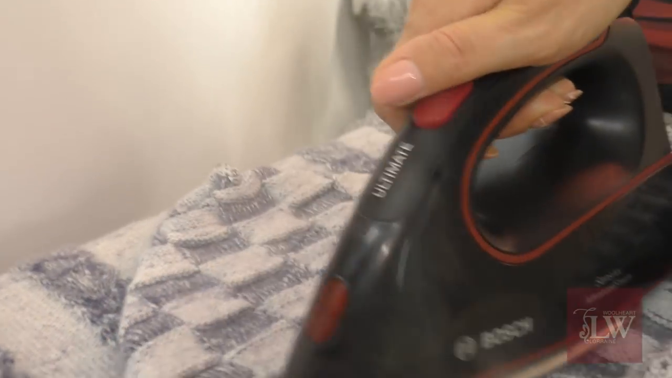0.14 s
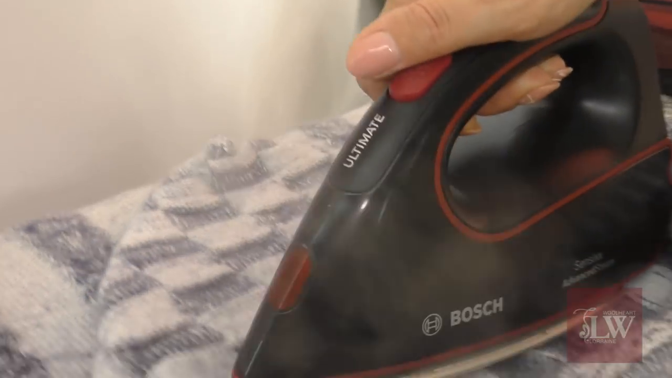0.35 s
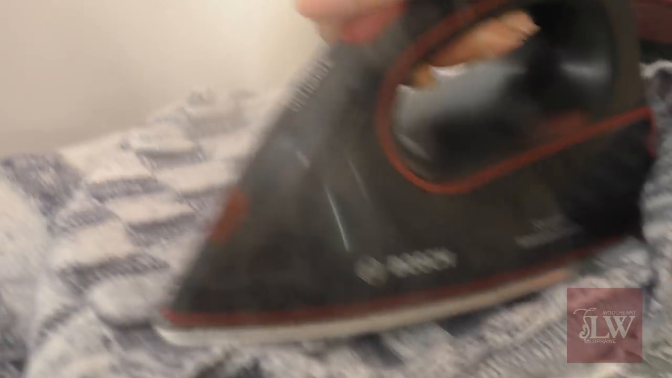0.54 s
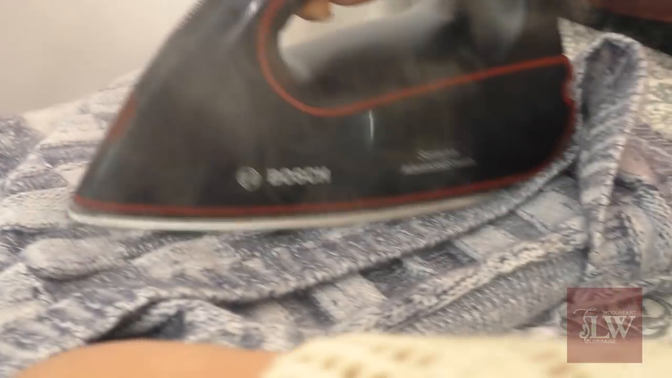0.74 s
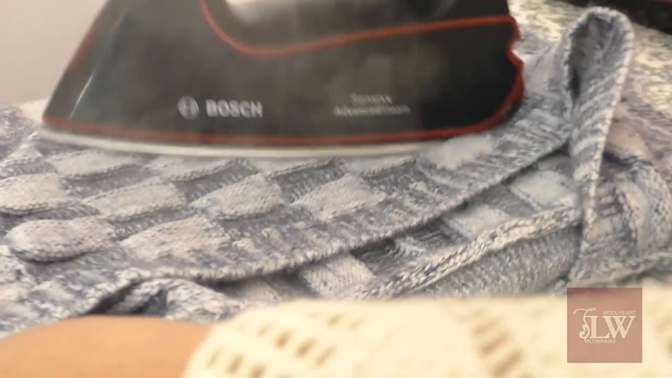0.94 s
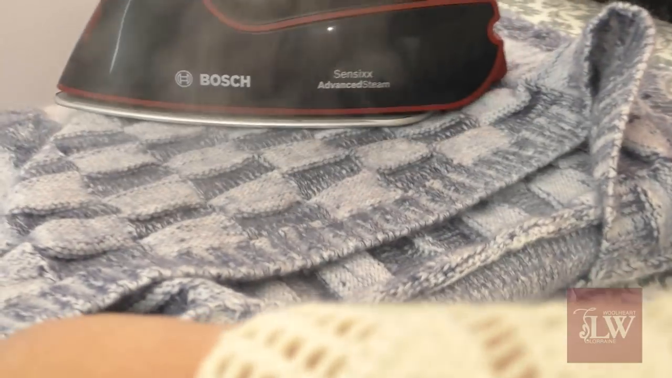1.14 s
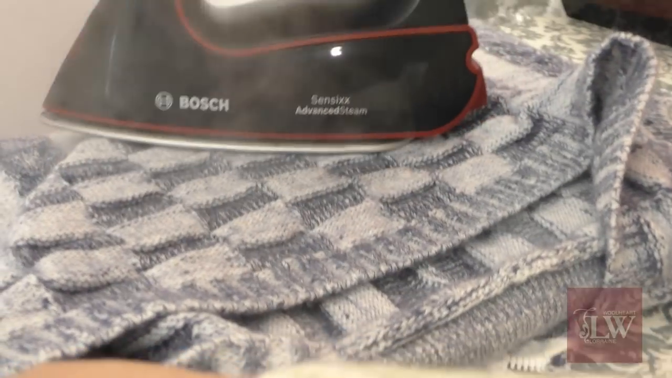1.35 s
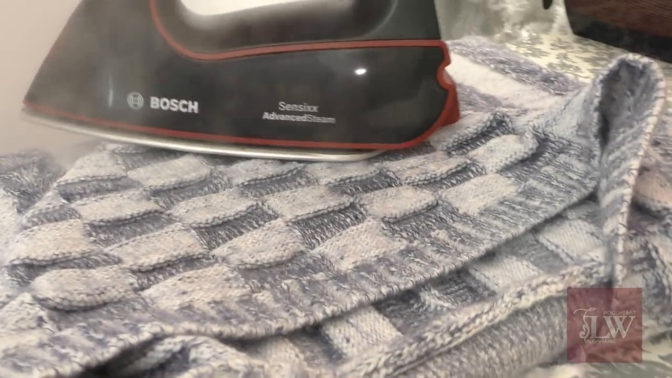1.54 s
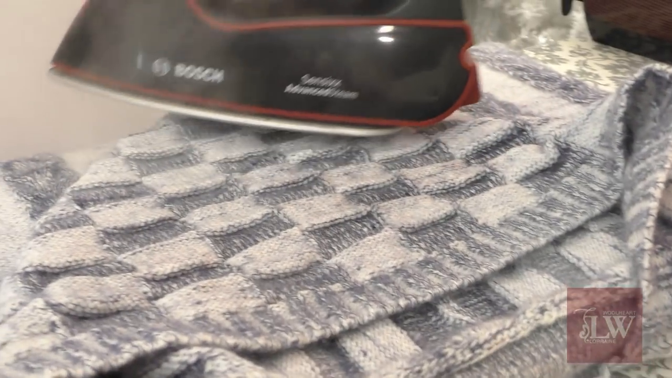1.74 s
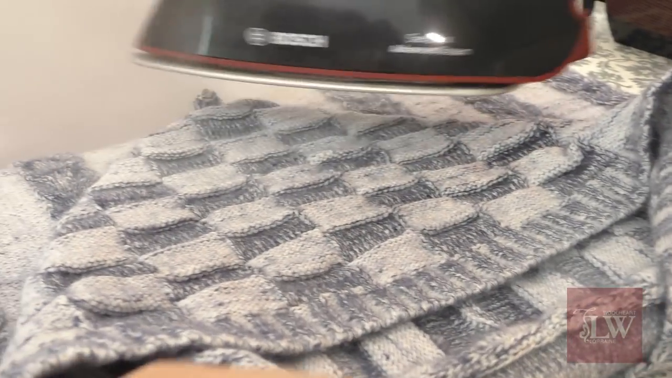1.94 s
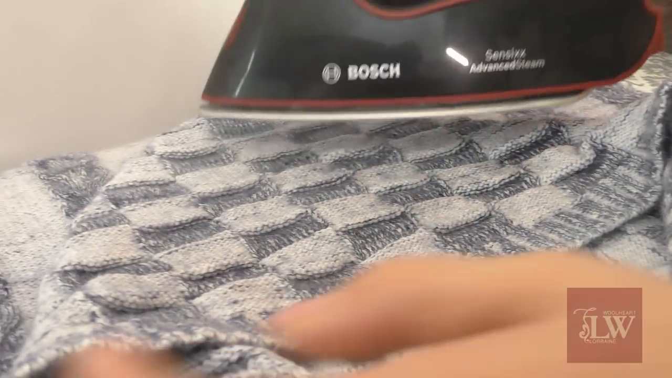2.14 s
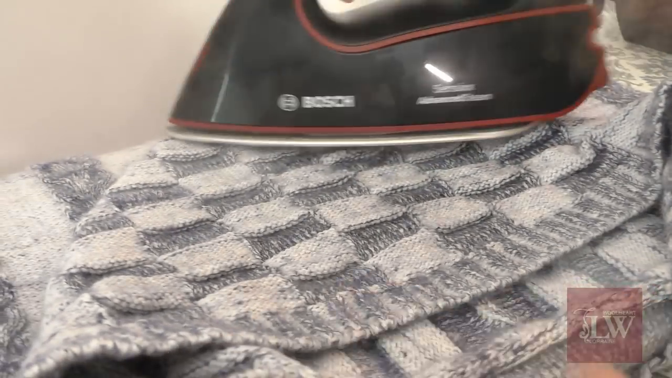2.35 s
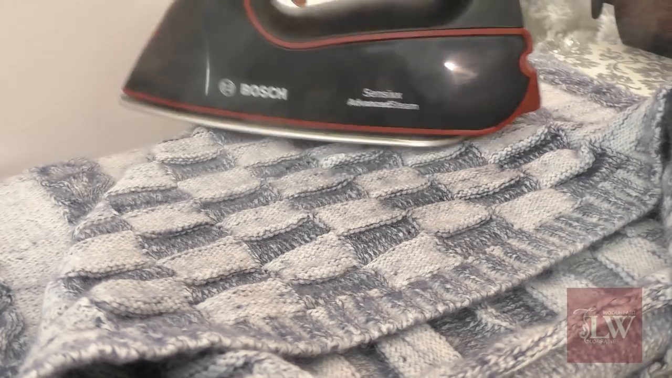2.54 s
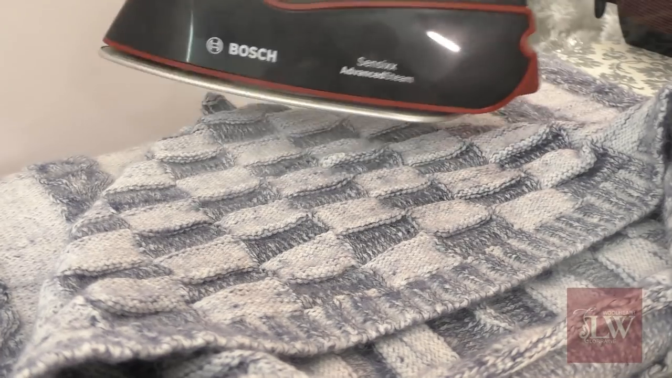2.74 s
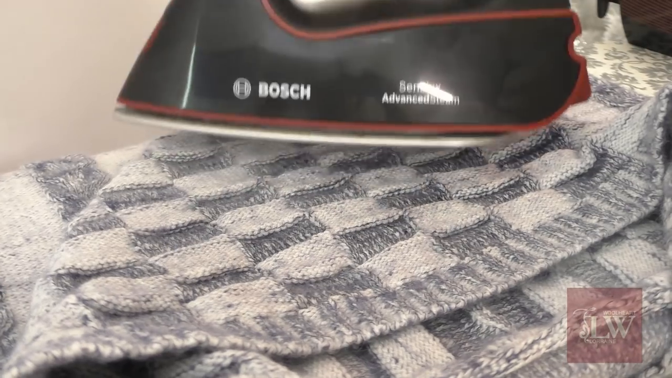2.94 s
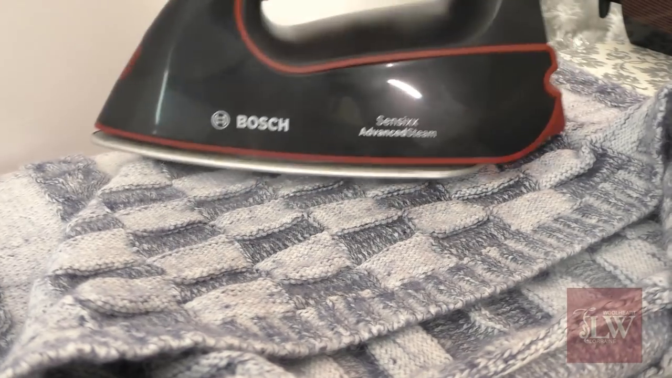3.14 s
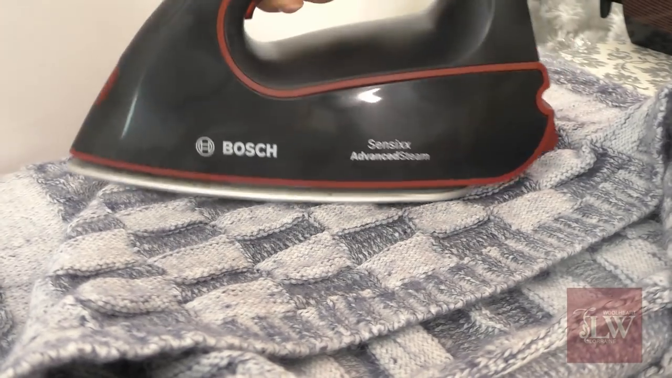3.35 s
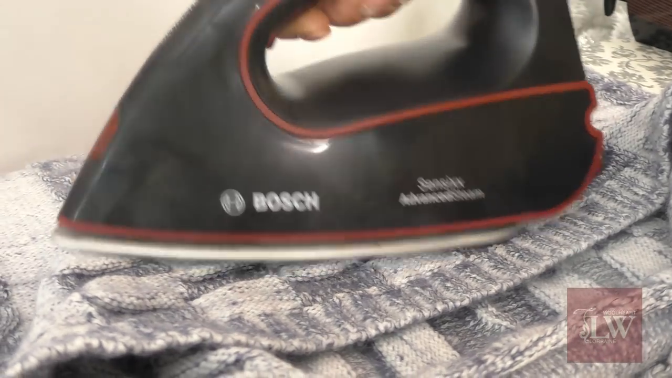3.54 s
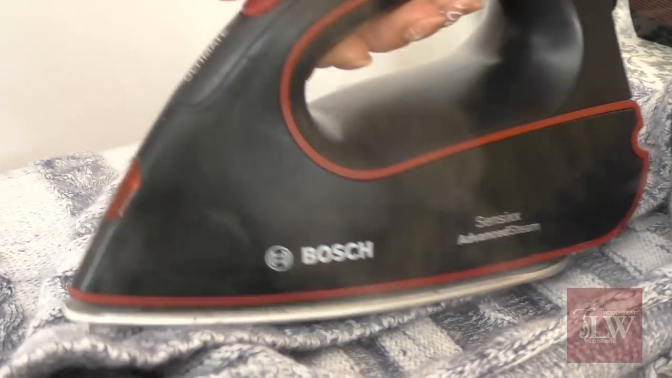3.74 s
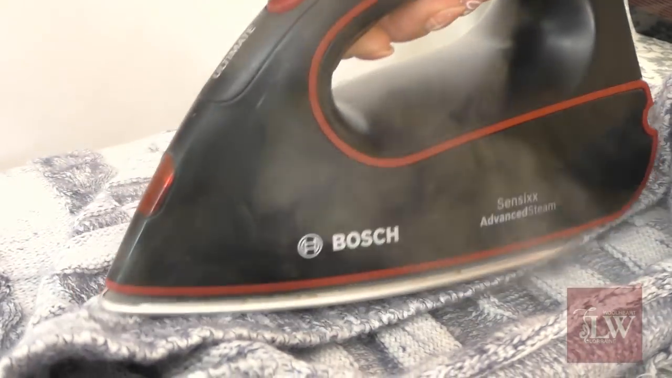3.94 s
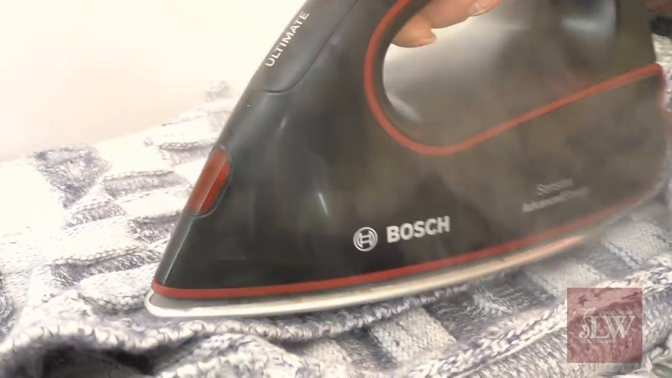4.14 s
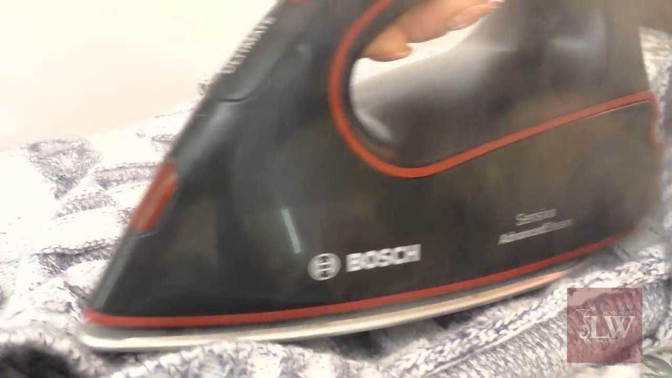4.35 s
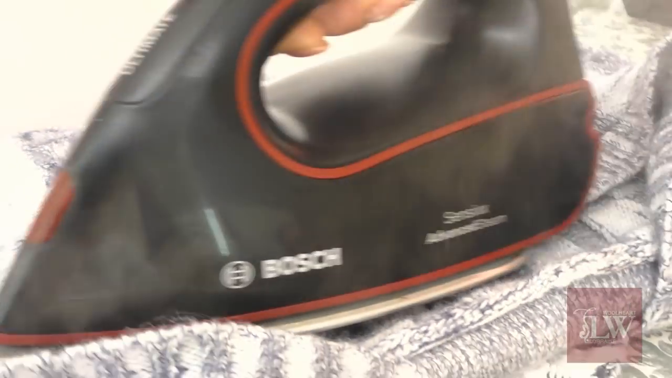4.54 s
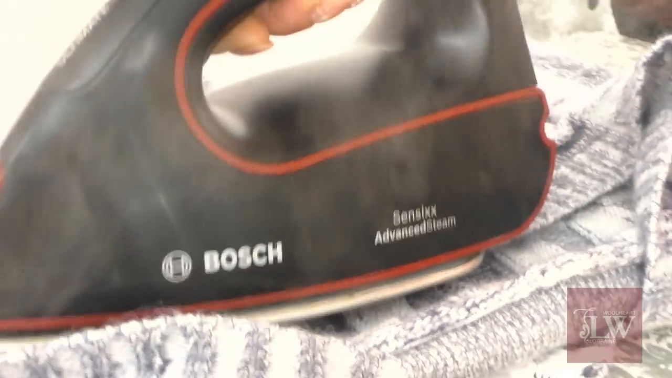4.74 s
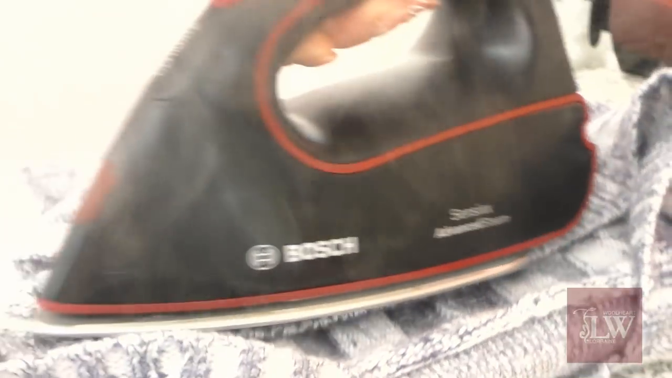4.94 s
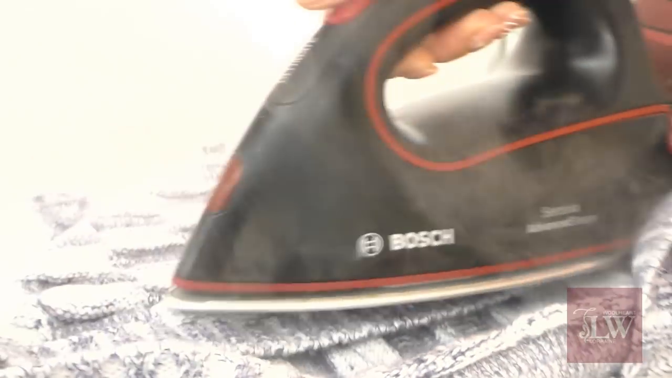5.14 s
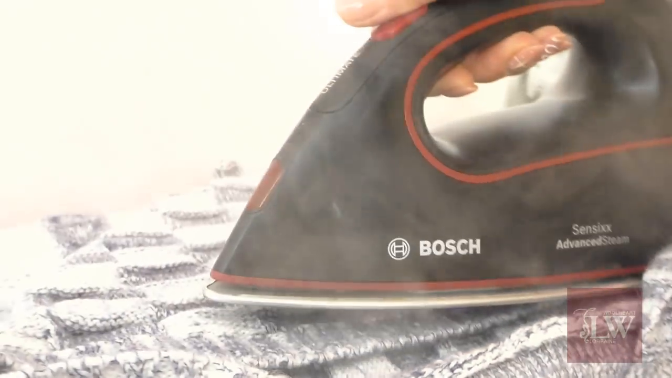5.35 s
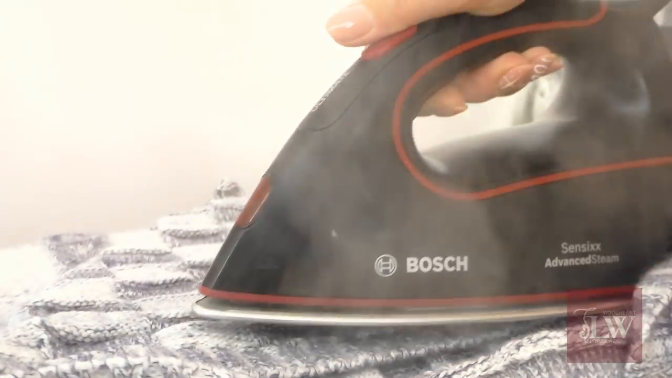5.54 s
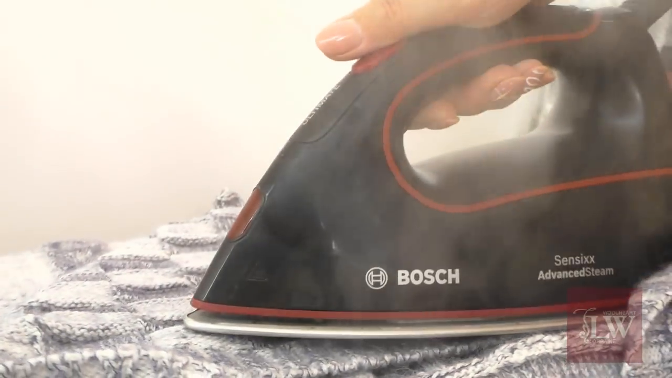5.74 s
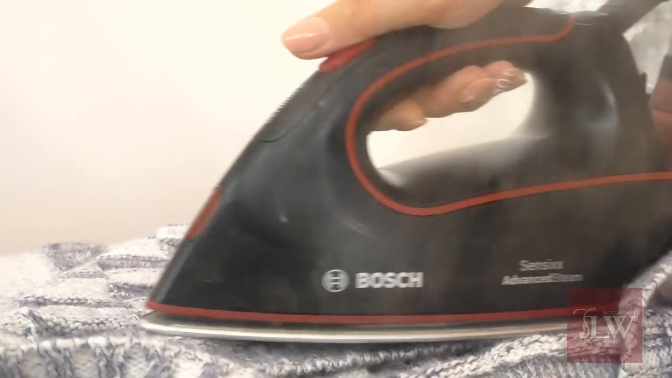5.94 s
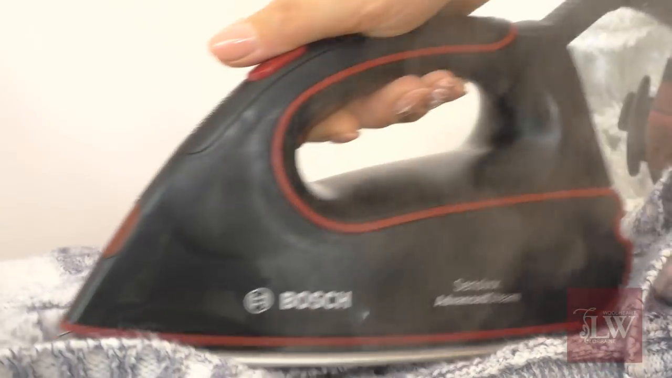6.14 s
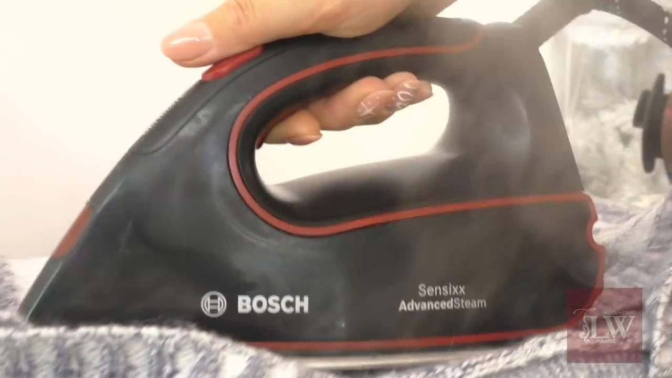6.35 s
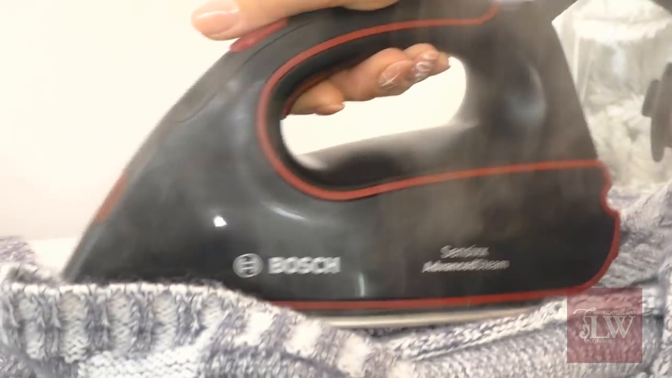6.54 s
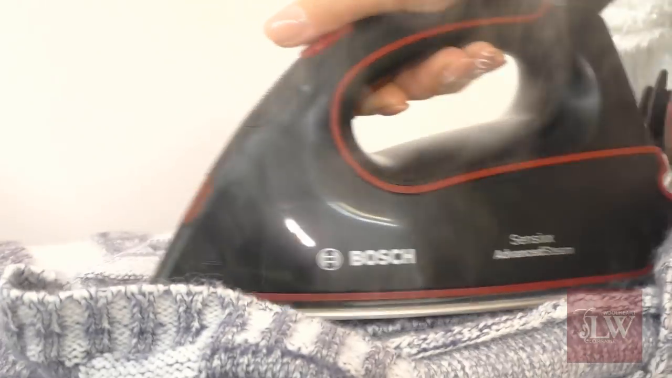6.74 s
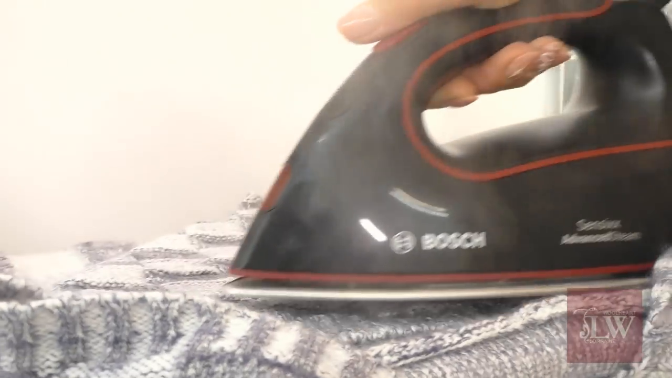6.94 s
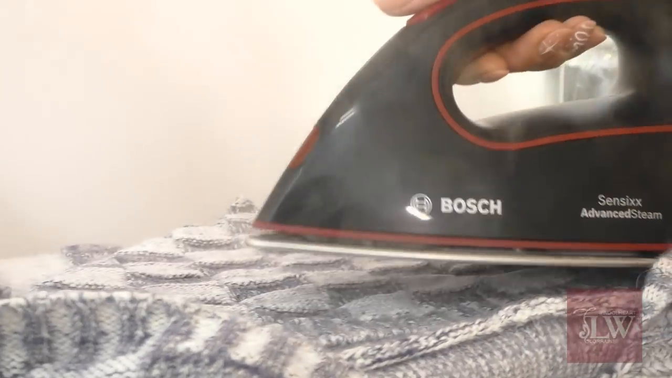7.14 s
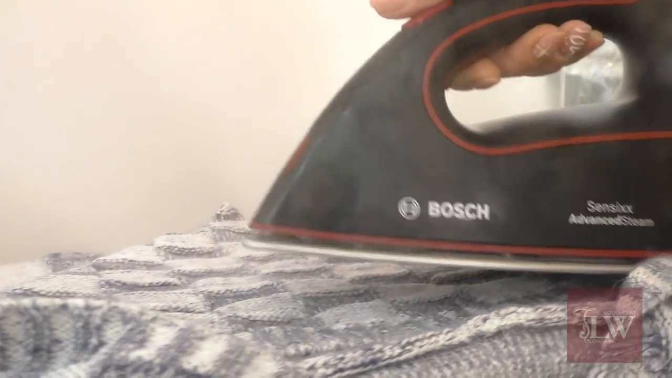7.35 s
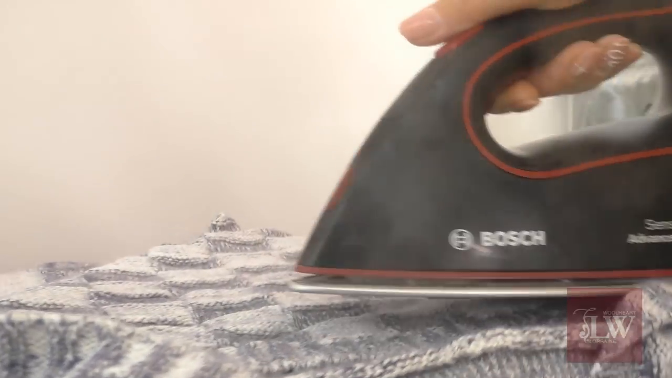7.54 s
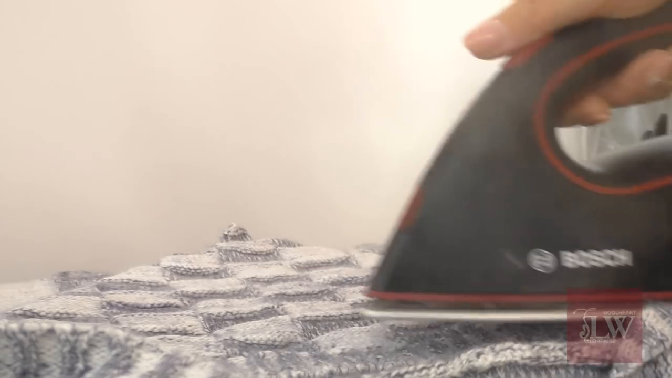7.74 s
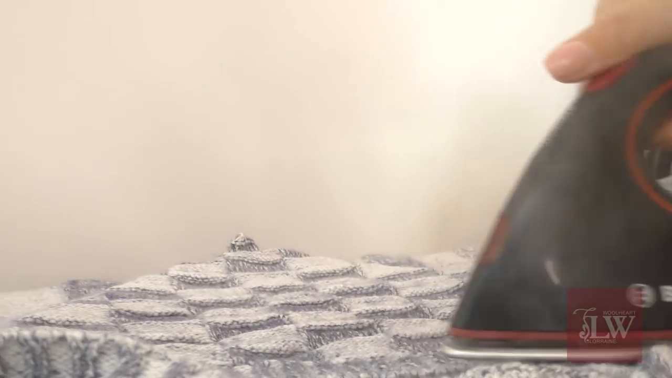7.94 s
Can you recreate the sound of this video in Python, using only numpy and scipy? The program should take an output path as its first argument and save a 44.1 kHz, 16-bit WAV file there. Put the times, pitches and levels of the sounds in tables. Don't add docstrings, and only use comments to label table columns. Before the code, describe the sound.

Continuous airy steam from an iron, recorded close in stereo with little room echo. Dense and mid-bright, it dulls slightly when pressed into fabric and brightens when lifted. Near two seconds a plastic snap precedes a muffled thud and quick fade. A soft low murmur fills the gap, with tiny trigger creaks, then a louder snap and valve pop restart the hiss, which runs on unbroken.

```python
import sys
import numpy as np
from scipy import signal
from scipy.fft import rfft, irfft
from scipy.io import wavfile
from scipy.ndimage import uniform_filter1d

SR = 44100
rng = np.random.default_rng(int(sys.argv[2]) if len(sys.argv) > 2 else 0)


def field_ratio(decibels):
    return 10 ** (np.asarray(decibels, dtype=float) / 20)


def to_wav(s):
    ch = np.atleast_2d(s).T
    pcm = np.round(np.clip(ch, -1, 1) * 32767)
    wavfile.write(sys.argv[1], SR, pcm.astype(np.int16))


N = 356935


def evened(x):
    return x / np.sqrt(np.mean(x ** 2) + 1e-20)


def read(points, hz):
    f, value = np.transpose(points)
    return np.interp(np.log(hz + 1), np.log(f + 1), value)


def bump(hz, centre_hz, width_hz):
    return 1 / (1 + (2 * (hz - centre_hz) / width_hz) ** 2)


def grid(size):
    return np.fft.rfftfreq(size, 1 / SR), np.arange(4 * N // size + 5) * size / 4 / SR


def drift(shape, tall, long):
    field = rng.standard_normal(shape[::-1]).T
    field = uniform_filter1d(field, max(round(tall), 1), 0)
    return evened(uniform_filter1d(field, max(round(long), 1), 1))


# pitch_hz, width_hz, level_db
SPOT_DIPS = [(573, 99, -5), (842, 71, -6), (6380, 440, -3)]


def noise(gain, hz, same, lean_db, lead=0):
    size = 2 * len(hz) - 2
    spot_db = sum(db * bump(hz, f, width) for f, width, db in SPOT_DIPS)
    gain = gain * (field_ratio(spot_db) * (hz < 15750))[:, None]
    a, b, c, d = rng.standard_normal((*gain.T.shape, 4)).T
    same = np.clip(same, -1, 1)[:, None]
    shared = a + 1j * b
    left = shared * field_ratio(lean_db / 2) * np.exp(1j * lead)
    right = (same * shared + np.sqrt(1 - same ** 2) * (c + 1j * d)) * field_ratio(-lean_db / 2)
    z = np.array([left, right]) * gain
    return signal.istft(z, nperseg=size, noverlap=size * 3 // 4)[1][:, :N]


# opens_s, shuts_s
VALVE_TIMES = [
    (-1, 1.92),
    (3.31, 9),
]
# start_s, flow_db, lift (0-1), left_right_db, board_comb_spacing_hz, echo_share (0-1)
HAND_PATH = [(0, -27.5, 0.29, -1.5, 900, 0.12), (.5, -27.5, 0.21, -2, 1070, 0.06),
             (1.0, -29, 0.39, .5, 1080, 0.1), (1.3, -30, 0.35, 0.8, 1440, 0),
             (1.56, -27.5, 0.45, 1.8, 1780, 0.22), (1.9, -30, .85, 1, 1800, 0.15),
             (3.35, -28, 0.6, 0, 1340, 0.2), (3.6, -28, 0.36, .4, 965, 0.18),
             (3.95, -27.5, 0.31, .1, 840, 0.08), (4.3, -27, 0.48, -1, 744, 0.19),
             (4.75, -27.5, 0.49, 1.9, 746, 0.09), (5.15, -27, 0.38, -0.8, 733, 0.17),
             (5.6, -27.5, 0.55, -1.5, 705, 0.28), (6.0, -28, 0.33, -1.5, 700, 0.29),
             (6.5, -27.5, 0.29, 1.2, 752, 0.3), (6.95, -25.5, 0.39, -1.5, 703, 0.17),
             (7.3, -27.5, 0.73, -2, 695, .2), (7.8, -26, 0.49, -2.5, 700, 0.12)]
# centre_s, half_length_s, level_db
FABRIC_PRESSES = [(0.86, .15, -4.5), (1.17, 0.096, -2.5), (3.865, 0.11, -2), (4.53, 0.13, -1.5),
                  (5.01, 0.14, -2), (6.158, 0.11, -3), (6.43, .06, -1), (6.786, 0.16, -4.5),
                  (7.563, 0.13, -1.5), (7.957, 0.13, -1.5)]
LIFT_BOOST_DB = [-11, -8.5, 0.5, -0.5, 18.5, 24]
PRESS_MUFFLE = [0.079, -0.066, 1.01, 1.53, 1.8, 1.4]
OPENING_BOOST_DB = [9.5, -3.5, -13.5, -14, -12, -3]
SHUT_SAG_DB = [30, 34, 44, 59.5, 70, 85]


def layer_levels(t):
    usual_lift, opening_s, sag_s = 0.4, 0.076, 0.2
    s, flow_db, lift = np.transpose(HAND_PATH)[:3]
    extra_lift = np.interp(t, s, lift) - usual_lift
    press_db = sum(db * np.exp(-((t - at) / half) ** 2) for at, half, db in FABRIC_PRESSES)
    opens, shuts = np.transpose(VALVE_TIMES)
    turn = np.maximum(np.searchsorted(opens, t + .03) - 1, 0)
    since_open = np.maximum(t - opens[turn], 0)
    since_shut = np.maximum(t - shuts[turn], 0)
    levels = np.interp(t, s, flow_db) + np.outer(LIFT_BOOST_DB, extra_lift)
    levels = levels + np.outer(PRESS_MUFFLE, press_db)
    levels = levels + np.outer(OPENING_BOOST_DB, np.exp(-since_open / opening_s))
    return levels - np.outer(SHUT_SAG_DB, 1 - np.exp(-since_shut / sag_s))


# start_s, vent_whistle_hz, gap_resonance_hz
PLATE_RIDGES = [(0, 5100, 2940), (.5, 4840, 2880), (.85, 5100, 2260), (1.45, 5200, 3000),
                (1.62, 5300, 2300), (1.9, 5300, 2250), (2.0, 5300, 2850), (2.1, 5270, 2370),
                (3.35, 5170, 2600), (3.55, 5400, 2340), (4.3, 5000, 2450), (4.75, 5400, 2280),
                (5.1, 5400, 2820), (5.95, 5960, 2920), (6.2, 5170, 2380), (6.6, 5400, 2350),
                (6.95, 5500, 2680), (7.8, 5400, 2416)]
# centre_s, half_length_s, pitch_hz, level_db
SINGING_FLARES = [(1.16, 0.15, 5700, 4.5), (1.63, 0.12, 5100, 8), (1.89, 0.11, 5200, 8.5),
                  (1.88, 0.036, 9900, 4), (1.7, 0.059, 9700, 4), (1.754, .1, 2400, 5),
                  (4.8, 0.23, 5640, 7.5), (4.9, 0.097, 11000, 2), (5.4, 0.44, 3100, 0.5),
                  (5.6, 0.12, 2700, -2.5), (7.04, 0.22, 5000, -3.5), (7.15, 0.24, 1700, 4.5),
                  (1.39, .07, 12500, 9), (4.42, 0.23, 1100, 8), (6.12, 0.19, 1600, 4),
                  (0.28, 0.2, 1080, -3.5), (1.8, 0.062, 2400, 4), (1.93, 0.14, 11800, -12),
                  (0.98, .15, 1520, -4), (1.79, 0.22, 1370, -9.5), (3.35, 0.056, 3000, 4),
                  (7.9, .1, 13000, -8), (7.25, 0.17, 12000, 4), (7.85, 0.22, 2330, 3), (1.4, .2, 6500, 4.5),
                  (3.45, 0.092, 3750, 5.5), (4.4, 0.094, 4400, 2.5), (7.9, .3, 3540, 2.5),
                  (1.44, 0.12, 500, 9)]


def plate_ridges(hz, t):
    s, vent_path, gap_path = np.transpose(PLATE_RIDGES)
    vent_hz, gap_hz = np.interp(t, s, vent_path), np.interp(t, s, gap_path)
    shut_s, reopen_s = VALVE_TIMES[0][1], VALVE_TIMES[1][0]
    ring_on_db = 45 * np.clip(t - shut_s, 0, .2) * (t < reopen_s - .1)
    total = 4.5 * bump(hz[:, None], vent_hz, 440)
    total = total + (3 + ring_on_db) * bump(hz[:, None], gap_hz, 510)
    for s, half, f, db in SINGING_FLARES:
        total = total + np.outer(bump(hz, f, 0.2 * f), db * np.exp(-((t - s) / half) ** 2))
    return total


# start_s, end_s, from_hz,
# to_hz, level_db
SLIDING_STREAKS = [(0, 0.88, 1540, 1440, -5.5), (0.7, 1.8, 1280, 2840, -7.5), (1.9, 2.02, 2460, 2200, -7.5),
                   (.5, 0.86, 1900, 2400, -7), (0.9, 1.36, 2350, 3720, -10.5), (0, 1.33, 3800, 3900, 6),
                   (2.0, 2.1, 3500, 3000, -11), (3.5, 3.7, 1720, 1500, -11), (3.5, 3.95, 3160, 2850, -6.5),
                   (3, 4.35, 2210, 1980, -3.5), (4, 4.3, 2200, 1920, -7), (3.7, 4.6, 3520, 3550, 7),
                   (5.5, 6.3, 3260, 3300, 3.5), (4.9, 6.0, 4000, 3600, -3.5), (5.5, 6.1, 2500, 2400, -4.5),
                   (6.5, 6.6, 2500, 2700, -5), (0, 1.3, 890, 1050, 3.5), (1, 1.5, 2040, 3020, 3),
                   (7, 8.05, 1650, 1430, -6.5), (7.0, 8.09, 950, 850, -6), (6.5, 7.6, 2500, 2470, -3.5),
                   (6, 5.95, 6500, 6500, -9), (5, 4.9, 6050, 6250, -4), (3, 4.05, 6700, 6450, 6),
                   (0, .3, 2970, 2900, 3), (.45, 0.62, 3100, 3260, 3), (1, 0.72, 2400, 2370, 2),
               (1.0, 1.5, 5150, 5250, 4.5), (1, 1.9, 4700, 4850, 4), (1.4, 1.8, 5750, 5950, 3),
               (3.4, 3.7, 2600, 2000, 4), (3.55, 3.65, 3100, 3050, 4), (3.7, 3.85, 2780, 2580, 3),
               (4.5, 4.5, 2400, 2280, 1), (4.0, 4.4, 3150, 2980, 3), (3.45, 3.75, 5480, 5480, 4.5),
               (3.5, 3.45, 4300, 4200, 4), (4.6, 5.0, 5000, 5080, 4.5), (4.65, 4.9, 5800, 5800, 2),
               (4.6, 5.25, 3800, 3800, 4), (5.1, 5.6, 2730, 2760, 2), (7, 6, 3080, 3050, 0),
               (6, 6.1, 2700, 2880, 2), (5.5, 6.0, 5600, 5600, 2), (6.5, 6.7, 2300, 2270, 2.5),
               (6.1, 6.35, 1480, 1450, 2), (7, 7.3, 3100, 2960, 3.5), (6.95, 7.3, 2120, 2160, 4),
               (6.5, 7.1, 1270, 1400, -3.5), (6.85, 7.05, 4450, 4450, 4), (7.1, 7.4, 5020, 5020, 4),
               (7.6, 8.09, 3700, 3950, 4), (10, 7.9, 2400, 1700, 2.5), (7.7, 8.09, 5600, 5300, 4),
               (.6, 0.93, 250, 220, -4), (4.5, 4.85, 660, 620, -3.5), (.75, 1.05, 1600, 1700, -3),
               (1.72, 1.8, 5250, 5100, -4), (3.5, 3.75, 2900, 2300, -2), (.8, 1.45, 1130, 1150, 3),
               (1.84, 1.93, 5250, 5250, 4), (1.84, 1.94, 9500, 9400, 4), (1.5, 1.8, 2800, 2700, -2.5),
               (7, 7.7, 1230, 1250, 3)]


def streaks(hz, t):
    total = 0
    for start, end, from_hz, to_hz, db in SLIDING_STREAKS:
        fade = np.clip(1 - np.maximum(start - t, t - end) / 0.1, 0, 1)
        centre_hz = np.interp(t, [start, end], [from_hz, to_hz])
        total = total + fade * db * bump(hz[:, None], centre_hz, 190)
    return total


def board_comb(hz, spacing_hz, share):
    share = np.clip(1.09 * share, 0, .9) * bump(hz[:, None], 0, 18000)
    return abs(1 + share * np.exp(-2j * np.pi * hz[:, None] / spacing_hz))


# pitch_hz, level_db per Hz
STEAM_COLOUR = [(35, -57), (60, -30.5), (281, -8.5), (330, -5.5), (579, -12.5), (682, -11.5), (1250, -6),
                (1740, -2), (2900, 0.5), (4420, -16.5), (5590, -18), (6580, -22.5), (9350, -19.5),
                (11000, -21), (16000, -36.5)]
# pitch_hz, width_hz, level_db
STEAM_DUCTS = [(323, 280, 1), (706, 35, 5), (1128, 586, 6.5), (2280, 65, 1), (3230, 220, 2),
               (5400, 290, -0.5), (7040, 260, 3), (9360, 190, 4)]
LAYER_CENTRES_HZ = [420, 1250, 2700, 4500, 8500, 14000]
# pitch_hz, likeness (0-1)
STEAM_LIKENESS = [(60, .12), (180, .9), (550, .965), (1650, .91), (5000, .86), (7300, .98), (10500, .87),
                  (15000, .35)]
# pitch_hz, left_right_db
STEAM_SIDE = [(60, 2), (180, 2), (550, -0.5), (1650, 1.5), (4970, 3.5), (15000, 2)]
# pitch_hz, lead_rad
STEAM_PHASE = [(60, 0), (300, -.08), (1460, 0.22), (3000, 0), (3450, .1), (5250, -0.13), (8000, 0),
               (16000, -.1)]


def steam():
    hz, t = grid(1024)
    layers = layer_levels(t)
    layers = layers - layers[2]
    rows = np.eye(len(LAYER_CENTRES_HZ))
    shares = np.array([np.interp(np.log(hz + 1), np.log(LAYER_CENTRES_HZ), row) for row in rows])
    ducts_db = sum(db * bump(hz, f, width) for f, width, db in STEAM_DUCTS)
    s, *path = np.transpose(HAND_PATH)
    lean_db, spacing_hz, share = (np.interp(t, s, column) for column in path[2:])

    shape = (len(hz), len(t))
    chance_db = np.interp(hz, [4000, 6500], [1.3, 2.6])[:, None] * drift(shape, 2, 50)
    chance_db = chance_db + 0.76 * drift(shape, 14, 6) + 0.5 * drift(shape, 240, 1.5)

    level_db = (read(STEAM_COLOUR, hz) + ducts_db)[:, None] + shares.T @ layers
    level_db = level_db + plate_ridges(hz, t) + streaks(hz, t) + chance_db
    gain = board_comb(hz, spacing_hz, share) * field_ratio(level_db)
    core = (hz > 1800) & (hz < 4000)
    gain /= np.sqrt(uniform_filter1d((gain[core] ** 2).sum(0), size=20))
    side_db = read(STEAM_SIDE, hz)[:, None] + lean_db
    hiss = noise(gain, hz, read(STEAM_LIKENESS, hz), side_db, read(STEAM_PHASE, hz)[:, None])

    now = np.arange(N) / SR
    shut = (now > VALVE_TIMES[0][1] + .3) & (now < VALVE_TIMES[1][0])
    return hiss * field_ratio(2 + layer_levels(now)[2]) * ~shut


# pitch_hz, level_db per Hz
MURMUR_COLOUR = [(25, -11), (80, -16), (160, -3.5), (260, -7.5), (420, -10), (620, -18), (950, -12.5),
                 (1400, -9.5), (2300, -14), (3000, -20.5), (4000, -28), (5500, -31.5), (11000, -31),
                 (15700, -29)]
# pitch_hz, likeness (0-1)
MURMUR_LIKENESS = [(60, 0.3), (180, 0.7), (550, 0.9), (1650, 0.79), (4970, 0.52), (15000, 0.37)]
# start_s, level_db
MURMUR_LEVEL = [(2.2, -50.5), (2.4, -52), (2.9, -52.5), (3.0, -49.5), (3.06, -49), (3.15, -50.5),
                (3.25, -53.5), (3.3, -56)]
# pitch_hz, level_db (rms)
MAINS_HUM = [(50, -69.5), (150, -66), (251, -64), (300, -80), (350, -68), (400, -72.5)]


def room_tone():
    hz, t = grid(2048)
    gain = field_ratio(read(MURMUR_COLOUR, hz)[:, None] + 1.2 * drift((len(hz), len(t)), 6, 6))
    now = np.arange(N) / SR
    murmur = evened(noise(gain, hz, read(MURMUR_LIKENESS, hz), 0.39))
    murmur = murmur * field_ratio(np.interp(now, *np.transpose(MURMUR_LEVEL)))
    hum = 0
    for f, db in MAINS_HUM:
        cycles = f * now + rng.random() + np.array([[0], [.17]])
        hum = hum + field_ratio(db) * np.sqrt(2) * np.sin(2 * np.pi * cycles)
    return murmur + hum * field_ratio([[1.5], [-.6]])


def ring(modes, rise=.0003):
    t = np.arange(SR // 3) / SR
    wave = sum(field_ratio(db - 60 * t / t60) * np.sin(2 * np.pi * hz * t) for hz, db, t60 in modes)
    wave = wave * (1 - np.exp(-t / rise))
    return wave / abs(wave).max()


def burst(spectrum, rise, t60):
    t = np.arange(8192) / SR
    hz = np.fft.rfftfreq(len(t), 1 / SR)
    colour = field_ratio(read(spectrum, hz)) * (hz < 16200)
    hiss = irfft(rfft(rng.standard_normal(len(t))) * colour)
    wave = evened(hiss) * field_ratio(-60 * t / t60) * (1 - np.exp(-t / rise))
    return wave / abs(wave).max()


def add(mix, s, sound, db, lean_db=0.):
    part = mix[:, round(s * SR):][:, :len(sound)]
    part += field_ratio(db + np.array([[.5], [-.5]]) * lean_db) * sound[:part.shape[1]]


# start_s, level_db (peak), left_right_db
SWITCH_TICKS = [
    (1.7636, -18.5, 5),
    (3.1833, -13, 3.5),
]
# pitch_hz, level_db, t60_s
SWITCH_HOUSING = [(1690, -17, 0.01), (2300, -12, .01), (2600, -8, .008), (3420, 2, 0.011), (4290, -2, .01),
                  (6160, -14, .012), (7870, -12, .008), (8950, 0, .006), (10000, -1, 0.008),
                  (10600, -6, .006), (11300, 0, .006), (12200, -5, .007), (15200, -16, .006)]
# pitch_hz, level_db per Hz
SNAP_COLOUR = [(700, -40), (1250, -16), (1700, -4), (2600, -0.5), (3800, 1), (5300, -20), (6500, -11),
               (8700, -1), (11000, -2), (13500, -15), (16400, -27)]
# pitch_hz, level_db per Hz
WALL_COLOUR = [(900, -30), (1800, -1), (4000, -1), (7000, -4), (11000, -5), (14000, -14), (16000, -30)]


def switch():
    out = np.zeros((2, N))
    for s, db, lean_db in SWITCH_TICKS:
        snap = .5 * burst(SNAP_COLOUR, rise=.0001, t60=0.0092)
        add(out, s, ring(SWITCH_HOUSING, rise=.00025), db - 2.5, lean_db)
        add(out, s, snap, db, lean_db)
        add(out, s + 0.0012, snap, db - 1, lean_db)
        for side_db in (-6, 6):
            add(out, s + 0.0036, burst(WALL_COLOUR, rise=0.0033, t60=0.15), db - 25.5, side_db)
    return out


# (pitch_hz, level_db, t60_s)
VALVE_SHUT_THUD = (1.912, -29.5, [(203.7, -3.5, 0.23), (446, -1, 0.055)])
# (pitch_hz, level_db, t60_s)
VALVE_OPEN_POP = (3.312, -19.5, [(285, 0, .016), (400, -10, .025), (200, -20, .06), (135, -27, .09)])


def valve_thuds():
    out = np.zeros((2, N))
    for s, db, modes in (VALVE_SHUT_THUD, VALVE_OPEN_POP):
        add(out, s, -ring(modes, rise=.006), db, 1.1)
    return out


# start_s, level_db (peak), pitch_hz, left_right_db
TRIGGER_CREAKS = [
    (3.104, -43, 1560, -1.0),
    (3.1108, -31, 1480, -0.5),
    (3.1455, -35, 1380, 0.0),
]


def trigger_creaks():
    out = np.zeros((2, N))
    for s, db, hz, lean_db in TRIGGER_CREAKS:
        add(out, s, ring([(hz, 0, .012), (0.74 * hz, -6, .02)], rise=0.00031), db, lean_db)
        add(out, s, burst(SNAP_COLOUR, rise=.0002, t60=.01), db - 11, lean_db)
        add(out, s, ring([(260, 0, 0.018)], rise=.001), db - 10, lean_db)
    return out


# (pitch_hz, level_db)
STEAM_SPIT = (3.309, -30, [(3000, -25), (7000, -18), (9500, -3), (12000, -6), (15300, 0), (15900, -14),
              (16400, -60)])
# start_s, level_db, pitch_hz
DROPLET_PUFFS = [
    (3.3088, -31, 15000),
    (3.3152, -25, 15100),
    (3.317, -36, 12200),
]


def steam_spit():
    out = np.zeros((2, N))
    s, db, colour = STEAM_SPIT
    add(out, s, burst(colour, rise=.008, t60=.055), db, -1.5)
    for s, db, hz in DROPLET_PUFFS:
        add(out, s, ring([(hz, 0, .012), (0.74 * hz, -3, .012)], rise=.001), db - 1, -1.5)
    return out


# pitch_hz, t60_s
ROOM_DECAY = [(200, 0.18), (1000, 0.19), (3000, 0.2), (8000, 0.16), (15000, 0.09)]


def room(x):
    taps = np.zeros((2, SR // 2))
    at = np.arange(220, SR // 2 - 20, 20)
    at = at + rng.integers(0, 20, (2, len(at)))
    np.put_along_axis(taps, at, rng.choice([-1., 1.], at.shape), 1)
    hz, t, z = signal.stft(taps, SR, nperseg=128)
    z = z * field_ratio(-60 * t / read(ROOM_DECAY, hz)[:, None])
    tail = signal.istft(z, SR, nperseg=128)[1]
    tail = tail + 0.39 * tail[::-1]
    return signal.fftconvolve(x, tail / np.linalg.norm(tail[0]), axes=1)[:, :N]


def scene():
    knocks = valve_thuds() + trigger_creaks() + steam_spit()
    return steam() + room_tone() + switch() + knocks + field_ratio(-16.5) * room(knocks)


def roll_off(x):
    return signal.sosfilt(signal.butter(12, 16530, fs=SR, output="sos"), x)


def record(dry):
    return roll_off(dry)


dry = scene()
out = record(dry)
to_wav(out)
```